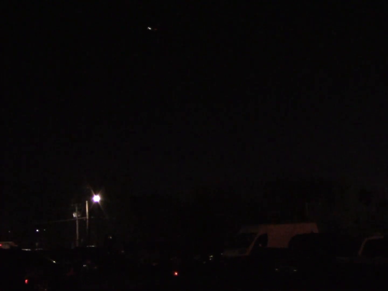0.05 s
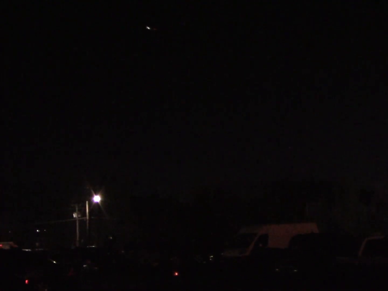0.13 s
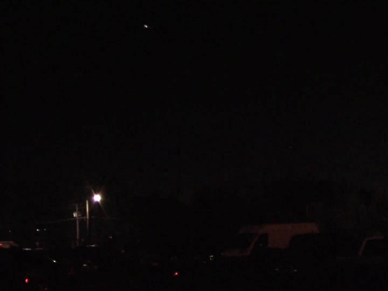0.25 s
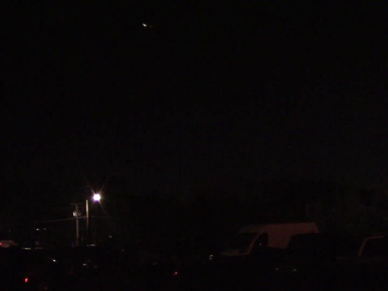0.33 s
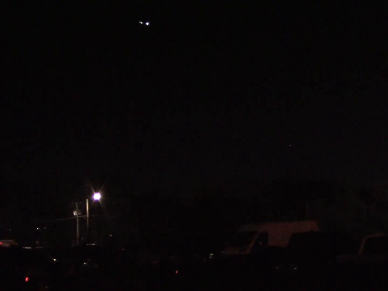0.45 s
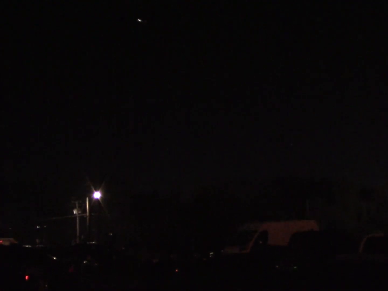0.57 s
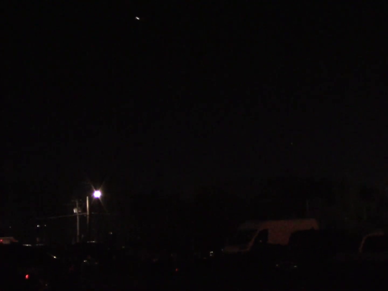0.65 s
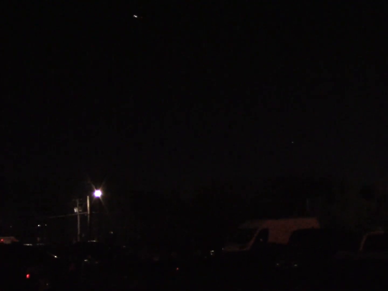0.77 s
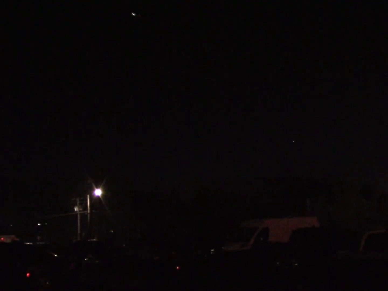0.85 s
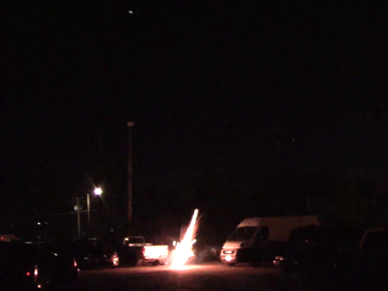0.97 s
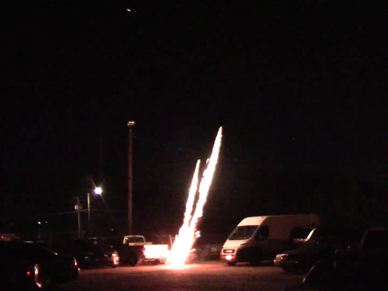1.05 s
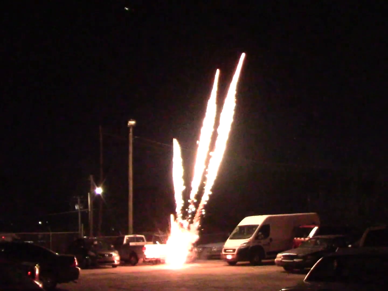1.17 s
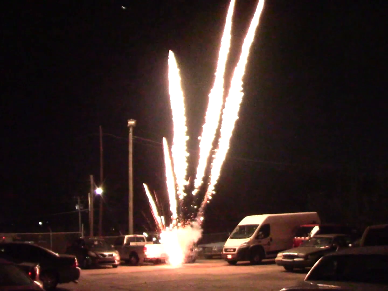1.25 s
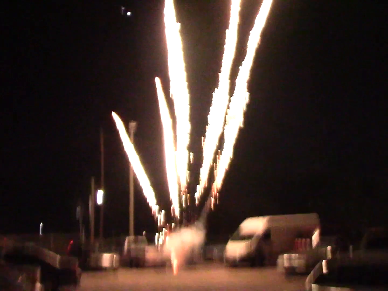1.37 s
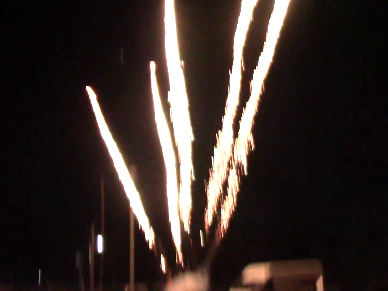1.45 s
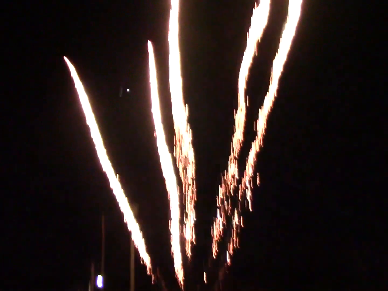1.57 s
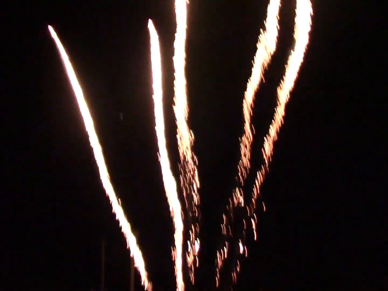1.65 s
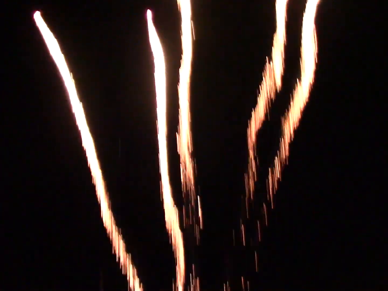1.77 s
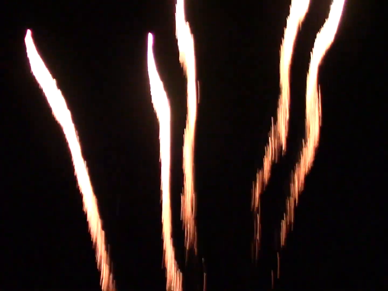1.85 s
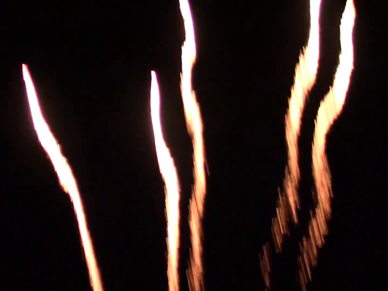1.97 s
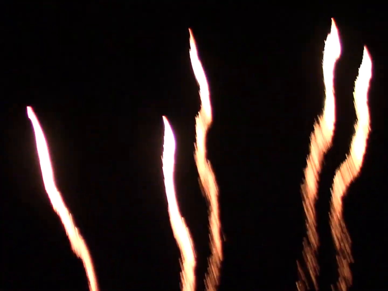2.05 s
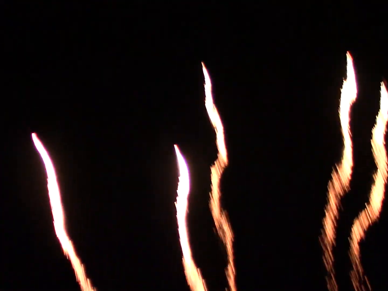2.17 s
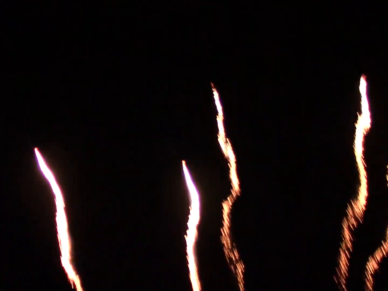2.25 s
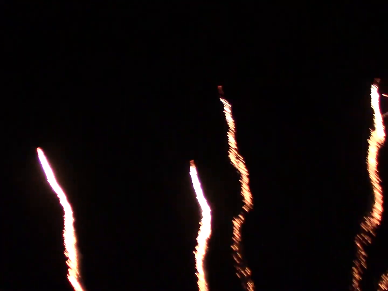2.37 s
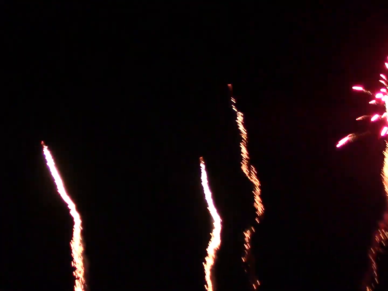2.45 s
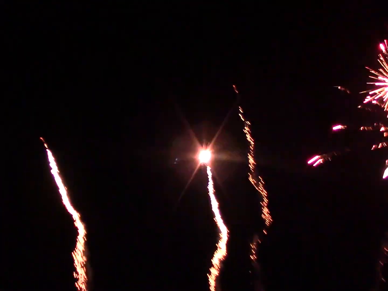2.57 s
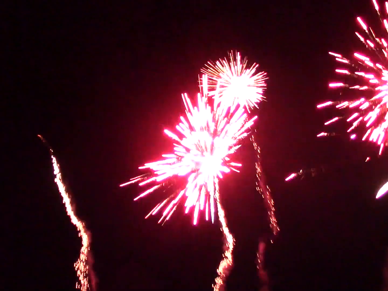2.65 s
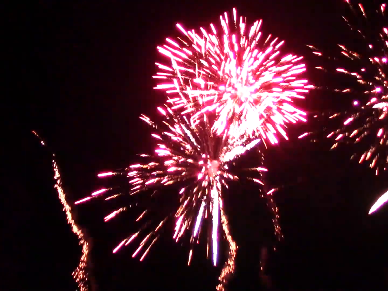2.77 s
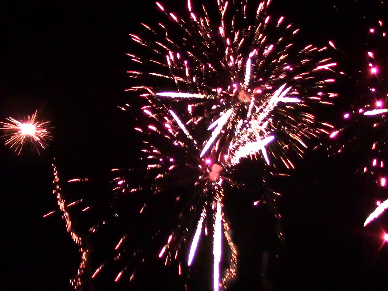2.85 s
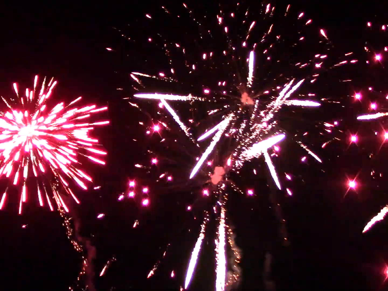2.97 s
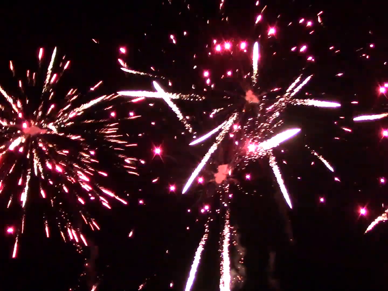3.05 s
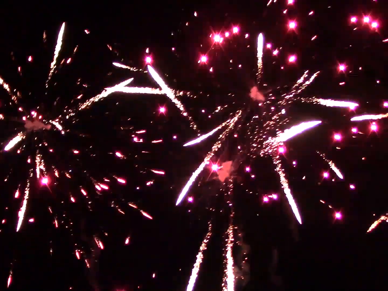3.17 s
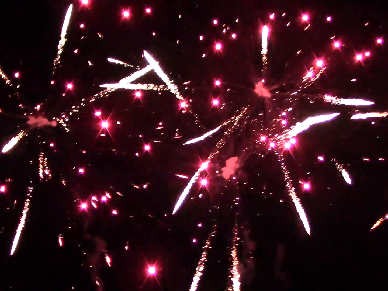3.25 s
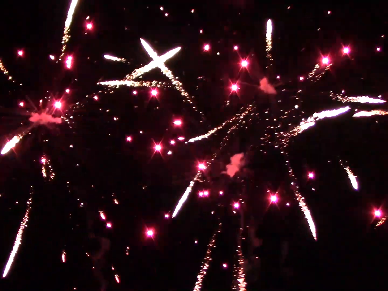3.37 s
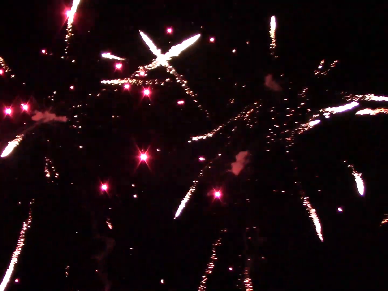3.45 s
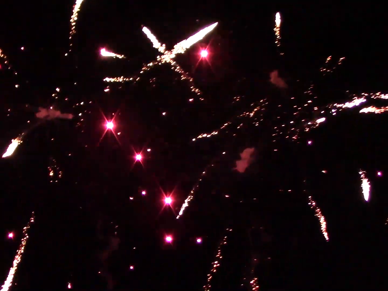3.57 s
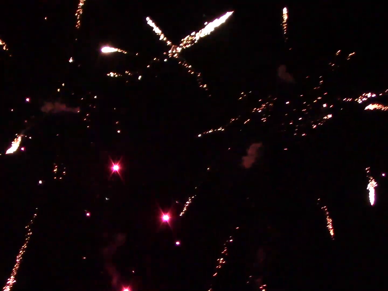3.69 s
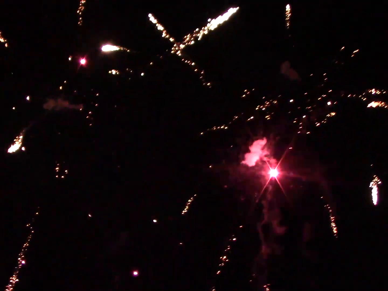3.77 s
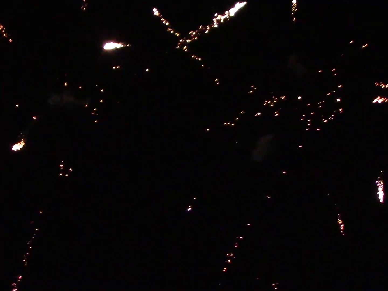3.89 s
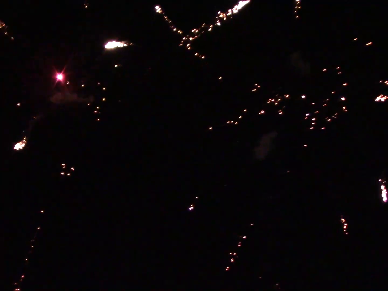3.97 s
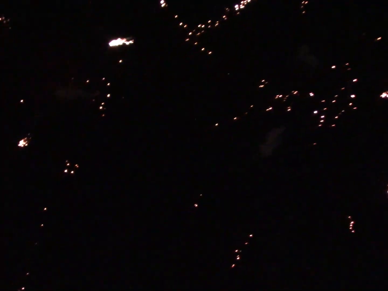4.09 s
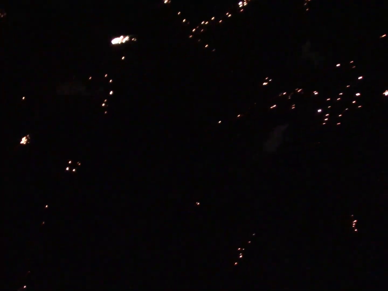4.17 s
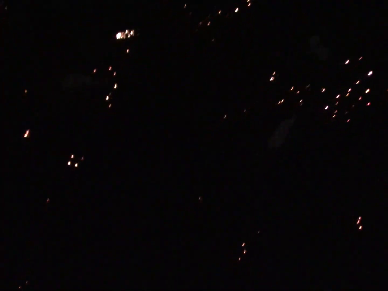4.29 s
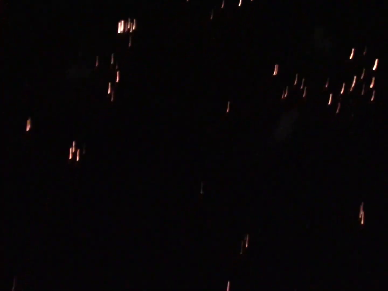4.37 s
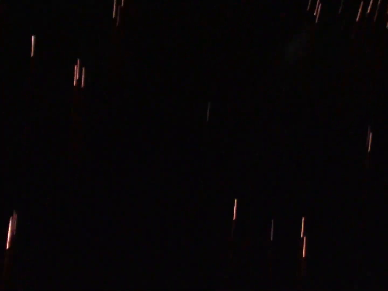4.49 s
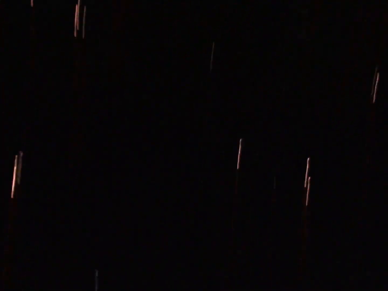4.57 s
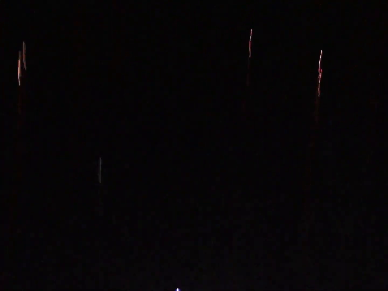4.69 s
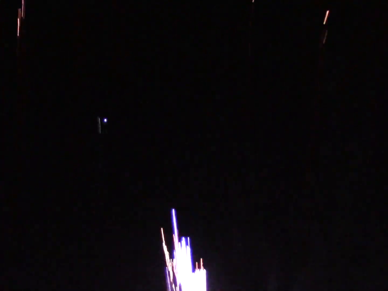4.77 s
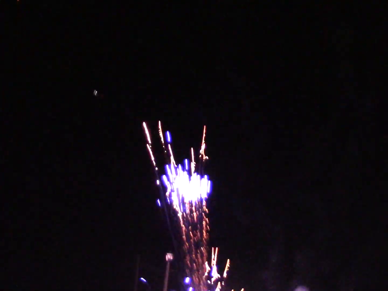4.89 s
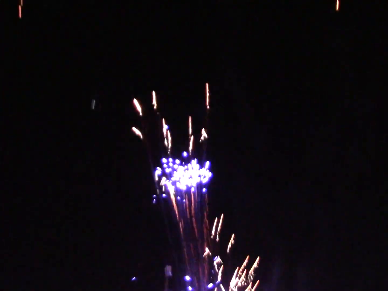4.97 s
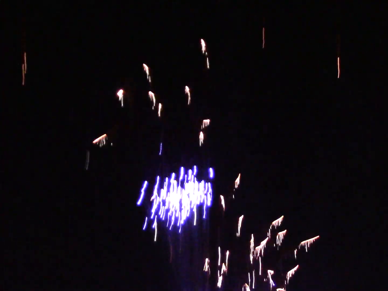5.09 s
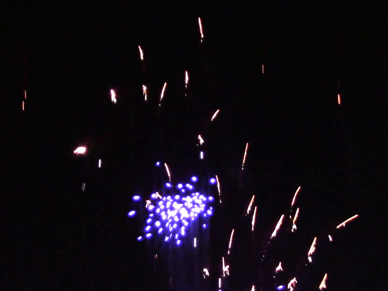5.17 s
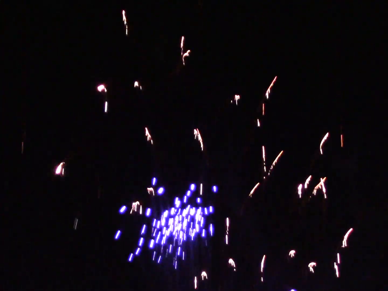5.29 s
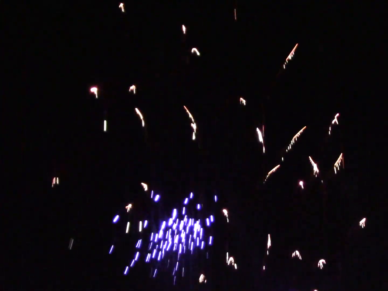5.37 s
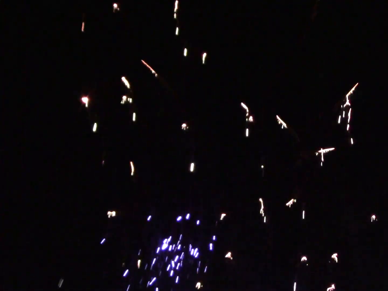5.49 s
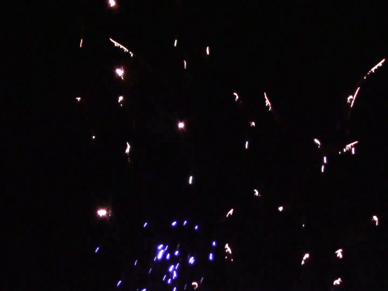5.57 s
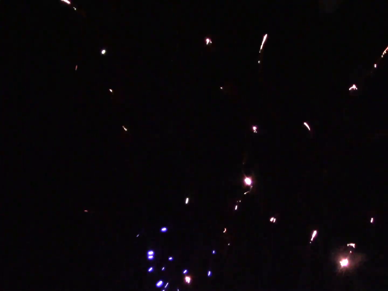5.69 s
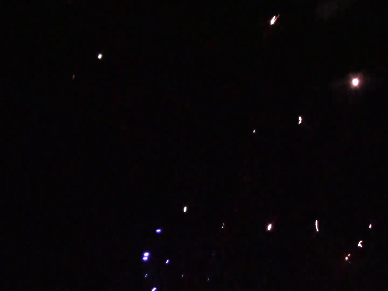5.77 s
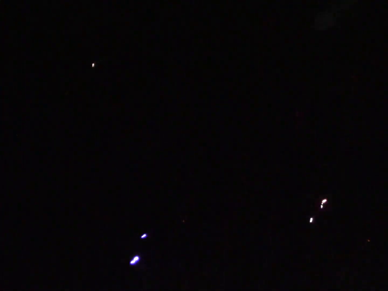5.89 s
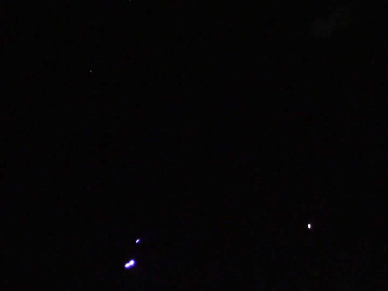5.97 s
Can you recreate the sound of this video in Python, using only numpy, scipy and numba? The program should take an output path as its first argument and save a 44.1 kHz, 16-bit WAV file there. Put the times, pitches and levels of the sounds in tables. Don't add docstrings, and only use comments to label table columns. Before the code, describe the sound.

Night in an open car park: for the first second there is only a faint high lamp buzz, low generator hum and soft wind. At about 1.0 s a fireworks cake fires five hard, hollow thumps, roughly 0.07 s apart, ending near 1.3 s, with sparks hissing and echoes slapping off nearby walls. The rumble thins, with tiny metallic pings and ticks until about 2.4 s. At 2.5 s a huge shell cracks overhead, followed by more at 2.7, 2.8 and 3.0 s, distorting the small camera microphone and making it duck. Deep rolling echoes and bright crackle swell, then fade towards 4 s. A small far pop comes at 4.4 s. From 4.6 to 4.9 s five lighter launch pops release dense, piercing, fluttering whistles, which sink in pitch, dull after 5.8 s and drop away at 6.0 s.

```python
import sys
import numpy as np
from scipy import signal
from scipy.fft import rfft, irfft
from scipy.io import wavfile
from scipy.ndimage import uniform_filter1d
from numba import njit

SR = 44100
rng = np.random.default_rng(int(sys.argv[2]) if len(sys.argv) > 2 else 0)


def natural_amplitude(level_db):
    exponent = np.asarray(level_db, float) / 20
    return 10 ** exponent


def transcribe(u):
    v = np.clip(np.atleast_2d(u).T, -1, 1)
    q = np.round(v * 32767).astype(np.int16)
    wavfile.write(sys.argv[1], SR, q)


N = 266364
T = np.arange(N) / SR

# t/s, peak level/dB, push length/ms, ground echo delay/ms, echo level/dB
LIFTS = [
    (1.0014, 1, .25, 8.0, 0),
    (1.0035, 15, 1.5, 2.3, -10),
    (1.065, 13, 1.5, 5, -15),
    (1.1414, 13, 1.5, 5.5, -12),
    (1.2073, 13, 1.5, 5, -15),
    (1.2778, 14, 1.5, 5, -10),
]
# t/s, peak level/dB, push length/ms, ground echo delay/ms, echo level/dB
BURSTS = [
    (2.4733, 22, 2.5, 9.6, -11),
    (2.6886, 16, .8, 10.5, -8),
    (2.6894, 18, 2.2, 6.3, -13),
    (2.7791, 17, 1.6, 10.6, -7),
    (2.9892, 19, 2.2, 9.8, -8),
]
# t/s, peak level/dB, push length/ms, ground echo delay/ms, echo level/dB
LATE_LIFTS = [
    (4.627, 11.8, 0.73, 5.2, 1),
    (4.7028, 7.5, 0.96, 4.8, 7.5),
    (4.7702, 8.4, 0.96, 6.2, -1),
    (4.8383, 6.2, 1, 8, 1),
    (4.909, 3.9, 1, 5.22, 2.5),
]
# lit t/s, level/dB, pitch factor, starting sharpness (0-1)
VOLLEYS = [(4.638, -5, 1.01, 0.1), (4.73, -10.5, 1.03, .05), (4.782, 2, 1.003, 0.14), (4.85, 0, .995, .17),
           (4.93, 2, 0.94, .08), (5.04, -9, 0.86, 0.23)]
# t/s, gain level/dB
CAMERA = [(4.72, 0), (4.8, -9), (5.0, -18), (5.57, -16.5), (5.81, -10), (5.97, -2.5), (6.04, 2)]


def level(x, db):
    return x * natural_amplitude(db) / np.sqrt(np.mean(x ** 2))


def colour(x, spectrum):
    hz, db = np.transpose(spectrum)
    f = np.fft.rfftfreq(4096, 1 / SR) + 1
    log_gain = np.interp(np.log(f), np.log(hz), db) * np.log(10) / 20
    cepstrum = irfft(log_gain)
    cepstrum[1:2048] *= 2
    cepstrum[2049:] = 0
    response = irfft(np.exp(rfft(cepstrum)))
    return level(signal.fftconvolve(x, response)[:len(x)], 0)


def walk(rate):
    hold = int(SR / rate)
    steps = np.repeat(rng.standard_normal(N // hold + 1), hold)
    slewed = uniform_filter1d(uniform_filter1d(steps, hold), hold)
    return level(slewed[:N], 0)


def pops(rate, spread_db):
    size_db = spread_db * np.minimum(rng.exponential(size=N), 4)
    return (rng.random(N) < rate / SR) * rng.choice([-1, 1], N) * natural_amplitude(size_db)


def add(out, s, x):
    i = int(s * SR)
    out[i:i + len(x)] += x[:N - i]


@njit
def follow(x, rise, fall):
    e, y = 0., np.empty(len(x))
    for i in range(len(x)):
        e += (x[i] - e) * (rise if x[i] > e else fall)
        y[i] = e
    return y


def curve(table):
    return np.interp(T, *np.transpose(table))


def swells(table, floor_db):
    power = natural_amplitude(2 * floor_db)
    for s, rise, hold, db, fade in table:
        faded = natural_amplitude(db - fade * np.maximum(T - s - rise - hold, 0))
        power = power + (np.clip((T - s) / rise, 0, 1) * faded) ** 2
    return np.sqrt(power)


def ducked(table, knee_db, share, late_s, back_s):
    db = 0
    for s, peak_db, _, echo_ms, echo_db in table:
        age = np.maximum(T - s, 0)
        excess = max(peak_db + max(echo_db, 0) - knee_db, 0)
        dip = share * excess * np.clip(age / late_s, 0, 1) * np.exp(-(age / back_s) ** 2)
        db = np.minimum(db, -dip)
    return natural_amplitude(db)


def lamp():
    # f/Hz, level/dB
    overtones = [(2514, -76), (2638, -65), (3957, -70), (4199, -72.5), (4560, -61), (4678, -76),
                 (4920, -73), (5157, -76), (5636, -72), (5879, -81), (5997, -78), (6476, -69.5)]
    buzz = sum(natural_amplitude(db + 0.5) * np.sin(2 * np.pi * (hz * T + rng.random())) for hz, db in overtones)
    return buzz * (T < VOLLEYS[0][0]) * natural_amplitude(-1.2 * T)


def generator():
    # f/Hz, level/dB
    engine_orders = [(274.5, -39.5), (344.5, -42), (414.5, -39), (484.5, -44.5), (549.1, -48.5),
                     (629.8, -51), (694.4, -43.5), (823.6, -64)]
    waver_db = 2.5
    orders = (natural_amplitude(db + 3 + waver_db * walk(5)) * np.sin(2 * np.pi * (hz * T + rng.random()))
              for hz, db in engine_orders)
    return natural_amplitude(curve(CAMERA)) * sum(orders)


def breeze():
    gust_s, gust_lasts_s, gust_db, steady_db = 2.41, .5, -38, -45
    noise = colour(rng.standard_normal(N), [(12, -24), (30, -24.0), (90, -0.5), (140, 2.5), (250, -44.5)])
    strength = natural_amplitude(steady_db) + natural_amplitude(gust_db) * np.exp(-((T - gust_s) / gust_lasts_s) ** 2)
    return strength * natural_amplitude(curve(CAMERA)) ** 2.1 * natural_amplitude(-5.5 + 0.93 * walk(12)) * noise


def town_rumble(swell_db):
    # start t/s, rise t/s, hold t/s, level/dB, fade/(dB/s)
    echoes = [(1.005, 0.017, 0.14, -15.5, 14), (1.3, 0.05, 0.024, -16, 78), (1.4, 0.19, 0.046, -31, 13),
              (2.48, 0.015, 0.69, -12, 21.5), (3.05, 0.43, 0.17, -10.5, 9.5),
              (4.63, 0.022, 0.12, -21.5, 68)]
    # f/Hz, level/dB
    far_spectrum = [(35, -52), (60, -30.5), (264, -3), (490, -1.5), (875, -12), (1500, -22), (1950, -25.5),
                    (3300, -120)]
    strength = swells(echoes, -31.5) * natural_amplitude(curve(CAMERA)) * natural_amplitude(1.5 + swell_db)
    return strength * colour(pops(3500, 1.18), far_spectrum)


def near_walls(swell_db):
    # start t/s, rise t/s, hold t/s, level/dB, fade/(dB/s)
    walls = [(1.005, 0.02, 0.28, -20.5, 58), (1.3, 0.066, 0.022, -20.5, 83), (1.4, 0.13, 0.11, -31.5, 15.6),
             (2.48, 0.022, 0.97, -21, 20.2), (4.63, 0.1, 0.013, -26, 300)]
    # f/Hz, level/dB
    near_spectrum = [(530, -30), (900, -1), (1220, 0.5), (2410, -6.5), (3700, -20.5), (5200, -33),
                     (7800, -40), (13200, -120)]
    strength = swells(walls, -46) * natural_amplitude(2.0 + swell_db + .5 * walk(29.9))
    return strength * colour(pops(4000, 1.9), near_spectrum)


def star_crackle(swell_db):
    # start t/s, rise t/s, hold t/s, level/dB, fade/(dB/s)
    sparks = [(1.005, 0.02, 0.37, -35.5, 97), (1.45, 0.063, 0.075, -44, 23), (2.48, 0.017, 0.58, -38, 29),
              (3.0, 0.17, .05, -42.5, 26)]
    # start t/s, rise t/s, hold t/s, level/dB, fade/(dB/s)
    last_stars = [(3.02, 0.41, 0.089, -37.5, 14)]
    # t/s, level/dB, length
    # t/s
    puffs = [(0.995, -41, .009), (3.746, -45, .012), (4.134, -56, .01), (4.222, -57, .008)]
    # f/Hz, level/dB
    fizz_spectrum = [(1760, -31), (3000, -0.5), (4930, -6.5), (8050, -12.5), (9330, -15.5), (14000, -30),
                     (15200, -33.5), (16000, -31)]
    out_s, dies_s, hiss_db = 4.0, .1, -66
    burnt = np.clip((out_s - T) / dies_s + .5, .12, 1)
    stars = burnt * swells(sparks, hiss_db) * natural_amplitude(curve(CAMERA))
    for s, db, length in puffs:
        stars = stars + natural_amplitude(db) * np.exp(-((T - s) / length) ** 2)
    fizz = stars * natural_amplitude(4.0 + swell_db + walk(36)) * colour(pops(9000, 3), fizz_spectrum)
    bright = level(np.diff(colour(pops(7000, 3), fizz_spectrum), prepend=0), 0)
    return fizz + burnt * swells(last_stars, -94) * natural_amplitude(walk(40)) * bright


def roll():
    swell_db = 1.1 * walk(25)
    diffuse = town_rumble(swell_db) + near_walls(swell_db) + star_crackle(swell_db) + breeze()
    after_bursts = ducked(BURSTS, 6.5, 0.85, 0.0028, 0.041)
    after_lifts = ducked(LIFTS + LATE_LIFTS, 7.9, 0.34, .003, 0.023)
    return diffuse * after_bursts * after_lifts


def pings():
    # t/s, peak level/dB, f/Hz, t60/s
    rings = [(0.9977, -6, 3520, 0.0056), (1.412, -14, 3280, .03), (1.515, -20, 2700, 0.04),
             (1.576, -16, 2640, 0.021), (1.652, -21.5, 2720, 0.047), (1.789, -27, 2750, 0.049),
             (2.1347, -18, 7600, 0.0013), (2.136, -20.5, 5100, 0.0036), (2.151, -28.5, 5000, .004),
             (2.19, -40, 4290, 0.0034), (2.3971, -33, 4500, .004)]
    out, t = np.zeros(N), T[:SR // 10]
    for s, db, hz, t60 in rings:
        envelope = natural_amplitude(db - 60 * t / t60) * np.clip(t / (0.049 * t60), 0, 1)
        add(out, s, envelope * np.sin(2 * np.pi * hz * t))
    return out


def shocks(table, rise_ms, mic_hz, thump_db, debris_db, debris_t60):
    # f/Hz, level/dB
    debris_spectrum = [(88, -36), (150, 0), (309, -1), (1260, -2.5), (3550, -18.5), (4490, -19.5),
                       (7180, -22.5), (16000, -46)]
    out, tails, t = np.zeros(N), np.zeros(N), T[:SR // 4]
    for s, db, push_ms, echo_ms, echo_db in table:
        age = t / (push_ms / 1000)
        blast = -natural_amplitude(db) * (1 - age) * np.exp(-age) * (1 - np.exp(-1000 * t / rise_ms))
        ground = uniform_filter1d(blast, size=15, origin=7, mode="constant")
        add(out, s, blast)
        add(out, s + echo_ms / 1000, natural_amplitude(echo_db) * ground)
        add(tails, s + 0.0013, natural_amplitude(db + debris_db) * natural_amplitude(-60 * t / debris_t60))
    ring = signal.sosfilt(signal.butter(3, mic_hz, "high", fs=SR, output="sos"), out)
    return ring + natural_amplitude(thump_db) * out + tails * colour(pops(6000, 2.5), debris_spectrum)


def tube_ring(table, db):
    tube_hz, t60_s = 515.5, 0.13
    out, t = np.zeros(N), T[:SR // 5]
    for (s, peak_db, *_), detune in zip(table, rng.standard_normal(len(table))):
        hz = tube_hz * (1 + .05 * detune)
        add(out, s + 0.0035, natural_amplitude(peak_db + db - 60 * t / t60_s) * np.sin(2 * np.pi * hz * t))
    return out


def whistles(count=6, spread=.019, chirp_s=.045, flutter_db=3.0, gas_db=-24, jet_db=-8, fourth_db=-12,
             stagger_s=.022, sputter=0.049, scatter=0.0502):
    tube_low_hz, tube_drop_hz, tube_sink_s = 3646, 1408, .42
    spent_s, dull_db_per_s = 5.833, 77
    out_s, out_db = 6.005, -12.5
    limit = .62
    dulled = dull_db_per_s * np.maximum(T - spent_s, 0)
    second_db, third_db = -17 - dulled, -26 - dulled
    db = -8.5 + out_db * np.clip((T - out_s) / 0.023 + .5, 0, 1)
    out, power = 0, 1e-9
    spent = 1 + 1.5 * np.clip((T - 5.55) / 0.2011, 0, 1)
    for s, volley_db, factor, chirp in VOLLEYS:
        for k in range(count):
            age = np.maximum(T - s - stagger_s * k / count, 0)
            fresh = np.exp(-age / chirp_s)
            waver = .009 * walk(300) + .009 * spent * walk(22)
            start = fresh * (chirp * rng.uniform(.5, 1.3) + sputter * walk(350))
            detune = spread * (1 + scatter * (spent - 1)) * rng.uniform(-1.7, 1.7)
            column_hz = tube_low_hz + tube_drop_hz * np.exp(-age / tube_sink_s)
            hz = column_hz * (factor + start + detune + waver)
            phase = 2 * np.pi * np.cumsum(hz) / SR
            size = natural_amplitude(volley_db) * np.clip(age / 0.0081, 0, 1)
            partials = natural_amplitude(second_db) * np.sin(2 * phase) + natural_amplitude(third_db) * np.sin(3 * phase)
            wave = np.sin(phase) + (1 - fresh) * partials
            wave += natural_amplitude(third_db + fourth_db) * np.clip(age / .5, 0, 1) * np.sin(4 * phase)
            out = out + size * natural_amplitude(flutter_db * walk(60)) * wave
            power = power + size ** 2
    gas = colour(rng.standard_normal(N), [(1500, -20.0), (2500, -7.0), (3500, -8.0), (4500, -8), (6500, -57)])
    jet = colour(rng.standard_normal(N), [(3500, -15), (5000, 3.5), (7000, 0.0), (10000, -10.0), (16000, -18)])
    hiss = natural_amplitude(gas_db) * gas + natural_amplitude(second_db + jet_db - 7.9 * (T - 5.5)) * jet
    whole = natural_amplitude(db - 1.5) * (T > VOLLEYS[0][0]) * (out / np.sqrt(power / 2) + hiss)
    whole *= np.minimum(limit / (follow(np.abs(whole), .05, .004) + 1e-9), 1)
    return whole * ducked(LATE_LIFTS, 5.7, 1.96, 0.0045, 0.041)


def stray():
    start_s, end_s, tone_hz = 4.9, 5.6, 5660
    wobble_s, wobble_hz, wobble_depth = 5.49, 11.3, 0.03377
    burning = uniform_filter1d(1. * ((T > start_s) & (T < end_s)), size=400)
    waver = .007 * walk(200) + 0.0022 * walk(9.3)
    wobble = wobble_depth * np.sin(2 * np.pi * wobble_hz * np.maximum(T - wobble_s, 0))
    phase = 2 * np.pi * np.cumsum(tone_hz * (1 + waver + wobble)) / SR
    db = -26 - 9.5 * (T - start_s)
    return burning * natural_amplitude(db + 2.5 + 4.6 * walk(100) + 0.55 * walk(45)) * np.sin(phase)


def scene():
    # t/s, peak level/dB, push length/ms, ground echo delay/ms, echo level/dB
    far_pop = [(4.381, 8.2, 0.8, 9, -9)]
    # t/s, left minus right level/dB
    pan = [(0, 0), (1.3, 0.1), (1.6, 1), (2.6, 1.1), (4.4, 0.5), (4.7, -3), (6.04, 1)]
    direct = shocks(LIFTS, 0.027, 330, -44, -20, 0.087)
    direct += shocks(BURSTS, 0.01, 299, -17, -32, 0.12)
    direct += shocks(far_pop, 1.9, 305, -34, -56, 0.11)
    direct += shocks(LATE_LIFTS, 0.068, 440, -60, -19, 0.1)
    direct += pings() + tube_ring(LIFTS, -25) + tube_ring(LATE_LIFTS, -20)
    direct += whistles() + stray()
    late = np.roll(direct, shift=130) - np.roll(direct, shift=411)
    mid = direct + roll() + lamp() + generator()
    side = natural_amplitude(-23.0) * roll() + natural_amplitude(-25.5) * late
    pan_db = curve(pan)
    return np.array([natural_amplitude(pan_db / 2) * mid + side, natural_amplitude(-pan_db / 2) * mid - side])


def top_cut(x):
    return signal.sosfilt(signal.butter(12, 16410, fs=SR, output="sos"), x)


def record(dry):
    over = follow(np.abs(dry).max(axis=0), 1 / (.009 * SR), 1 / (.035 * SR))
    gain = np.minimum(.65 / (over + 1e-9), 1) ** .8
    top = signal.ellip(8, .1, 60, 16350, fs=SR, output="sos")
    mix = signal.sosfiltfilt(top, np.clip(dry * gain, -.98, .98))
    return top_cut(mix)


dry = scene()
out = record(dry)
transcribe(out)
```